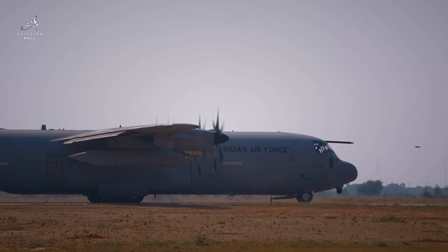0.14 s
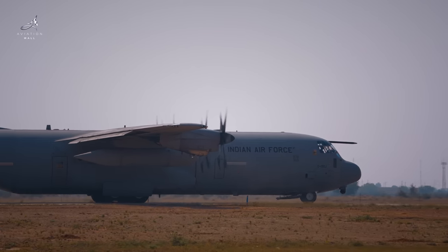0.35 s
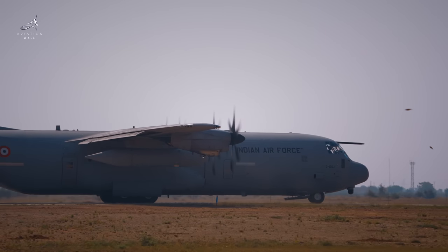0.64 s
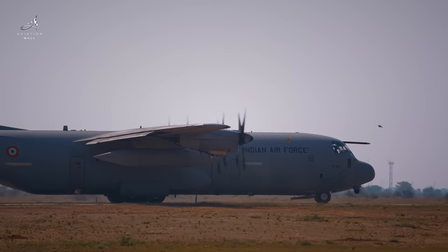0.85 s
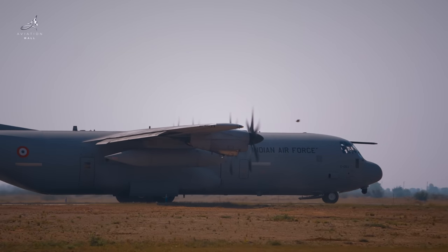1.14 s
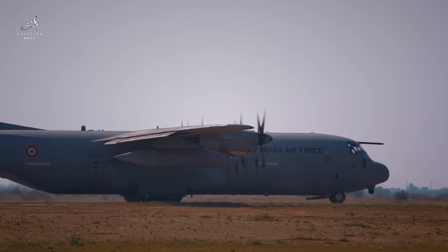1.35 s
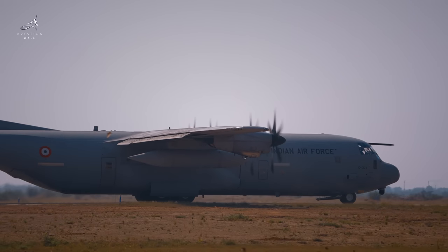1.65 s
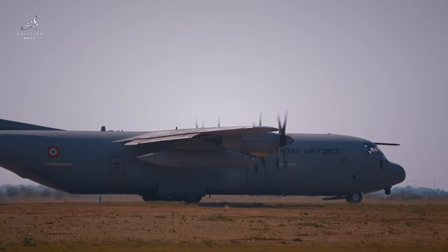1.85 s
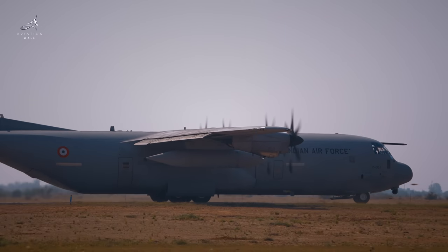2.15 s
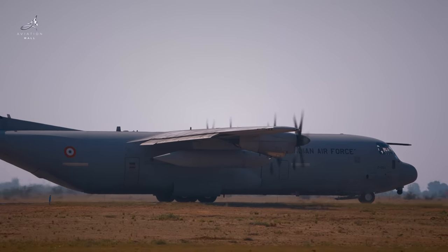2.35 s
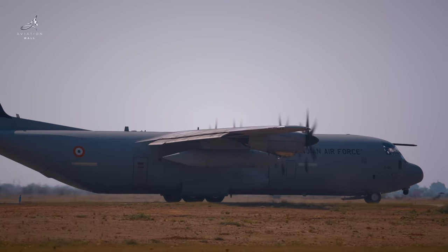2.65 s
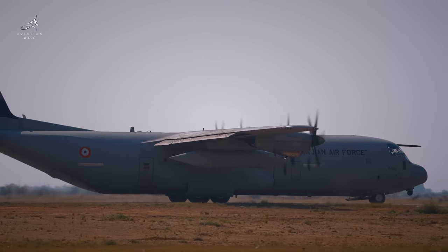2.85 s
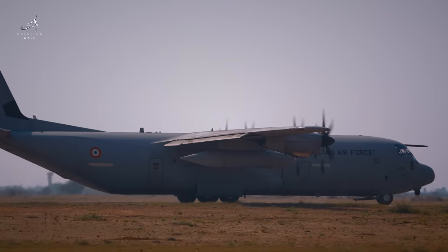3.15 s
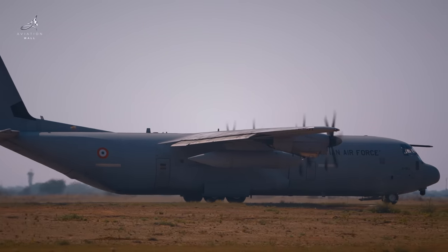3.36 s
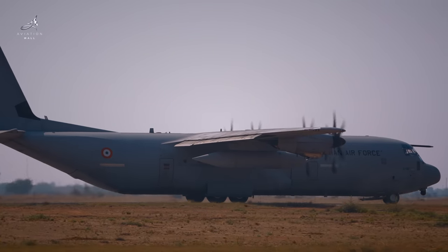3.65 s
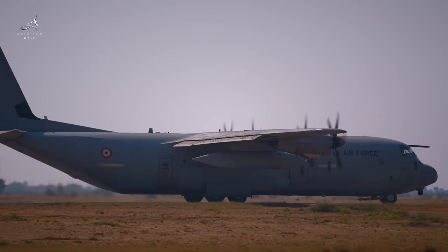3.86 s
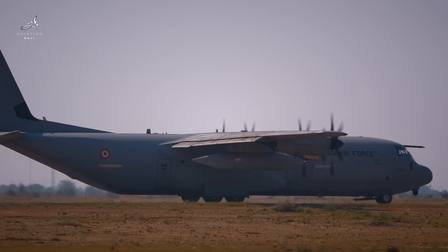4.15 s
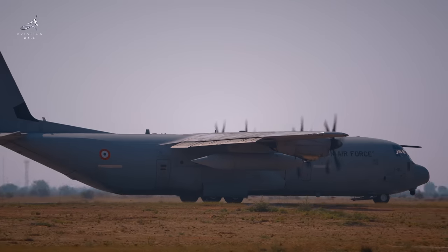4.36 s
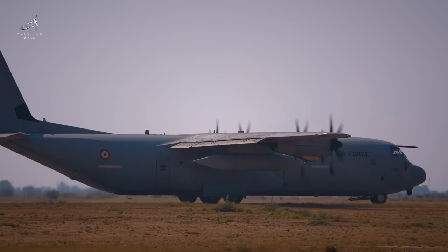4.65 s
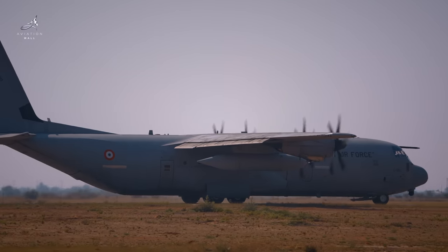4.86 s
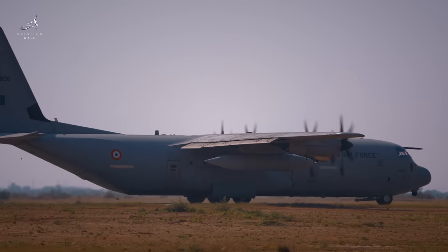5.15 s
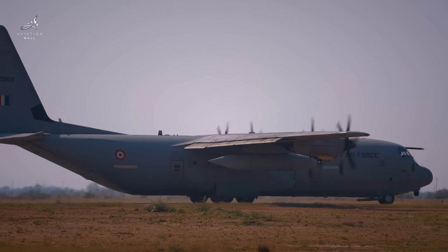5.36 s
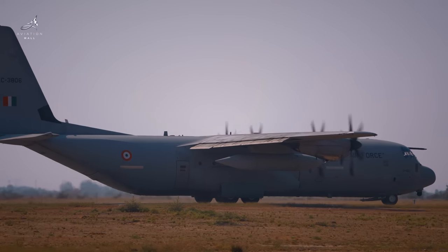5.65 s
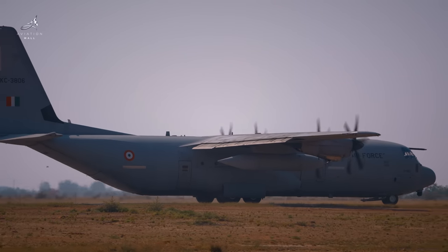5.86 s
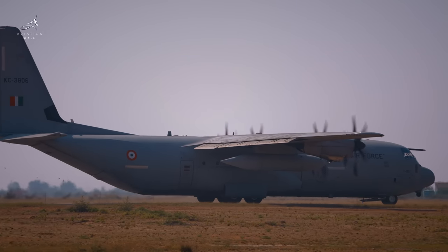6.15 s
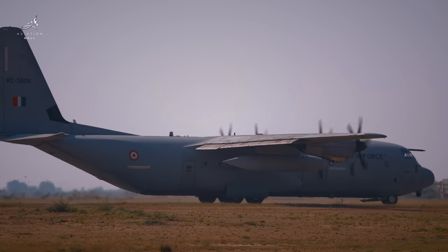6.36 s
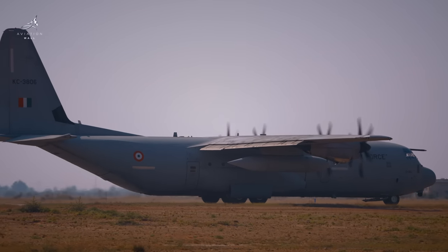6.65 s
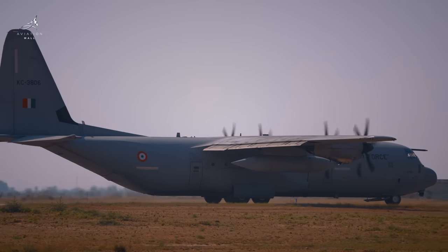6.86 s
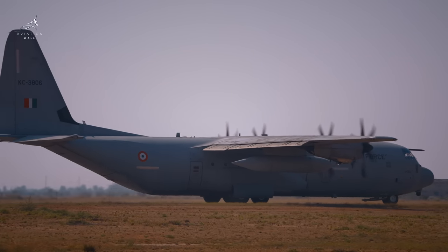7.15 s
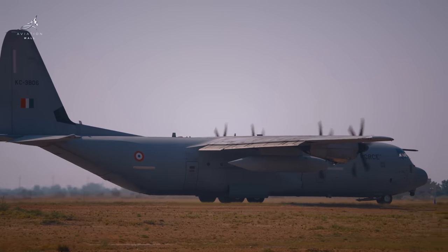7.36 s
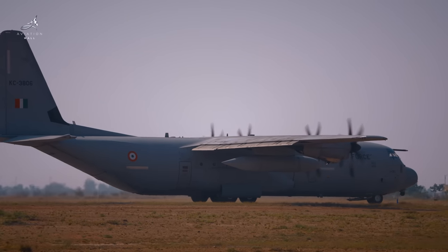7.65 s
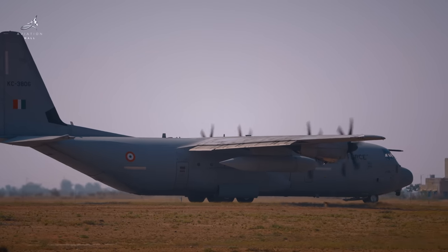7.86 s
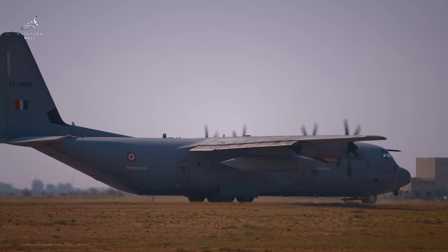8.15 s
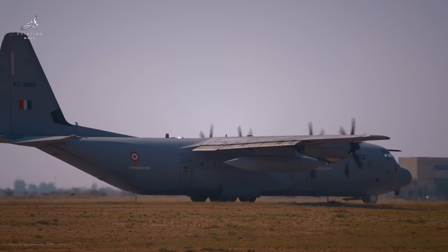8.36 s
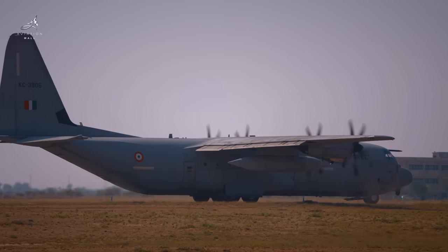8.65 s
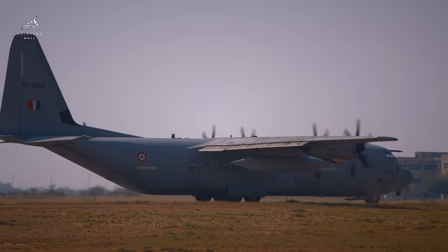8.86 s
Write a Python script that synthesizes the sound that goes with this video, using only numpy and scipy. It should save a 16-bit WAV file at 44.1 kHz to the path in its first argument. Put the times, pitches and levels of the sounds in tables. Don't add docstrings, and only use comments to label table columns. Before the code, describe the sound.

A large four-engine turboprop taxis far off across an open, dry airfield, picked up by one distant microphone. From 0 to 2.6 s, low wind gusts thump and flutter on the microphone over a wide rushing roar, fullest and brightest around 0.5 to 1.5 s. Beneath it the propellers, slightly out of step, hum near 70 Hz with higher harmonics, beating irregularly; blades put a fine rapid flutter in the roar, and a turbine whine is faint. From about 2 s the roar gradually weakens, becoming softest and more distant near 4.7 to 5.3 s, with the wind mostly calmer and the low drone still throbbing. From 6 s the roar swells again, strong by 7 to 7.5 s, with fuller upper drone harmonics as the aircraft turns tail on. Gusts return from 6.5 s, with a deep heave near 8.4 s. The roar eases slightly and continues to the end at 9 s.

```python
import sys
import numpy as np
from scipy import signal
from scipy.fft import next_fast_len
from scipy.io import wavfile
from scipy.ndimage import uniform_filter1d

SR = 44100
rng = np.random.default_rng(int(sys.argv[2]) if len(sys.argv) > 2 else 0)


def volts_from_db(level):
    exponent = np.asarray(level, float) / 20
    return 10 ** exponent


def generate_wav(signal):
    frames = np.transpose(np.atleast_2d(signal))
    scaled = np.clip(frames, -1, 1) * 32767
    pcm = np.round(scaled).astype(np.int16)
    wavfile.write(sys.argv[1], SR, pcm)


N = 397782

BLADE_RATES = [
    69.0,
    70.3,
    71.5,
    73.6,
]
ORDER_LEVELS = [-43, -42.5, -45]
ORDER_TURN_CHANGES = [-3.5, 3, 5]
ORDER_PATH_SHARES = [0.0, .1, 0.47]
# order, level_db
UPPER_ORDERS = [(4, -9), (5, -15), (6, -13.5)]
# peak_s, length_s, change_db
FIRST_ORDER_BEATS = [(.97, 0.18, -22), (1.64, .15, 5.5), (2.1, .2, 6), (2.38, .25, 7), (2.75, .2, -4),
                     (3.0, 0.14, 7), (3.35, 0.18, 3), (3.48, .1, -10), (3.95, 0.87, 5.5), (4.73, .15, -7),
                     (5.0, 0.18, 3.5), (5.65, .5, 4.5), (6.5, .3, 2), (6.95, .15, 3.5), (7.75, 0.32, 8),
                     (8.22, .25, -4)]
SECOND_ORDER_BEATS = [(.1, .3, -8), (.97, .15, -7), (1.25, .2, 4), (1.45, 0.17, -9), (2.0, .3, 3.5),
                      (2.7, 0.13, 5.5), (2.93, 0.14, 8), (3.2, 0.26, 5.5), (4.0, 0.13, 4.5),
                      (4.45, .3, 4.5), (5.33, .2, -6.5), (5.7, 0.48, 5), (6.2, 0.35, -4.5),
                      (6.7, 0.15, 8.5), (7.03, 0.23, 7), (7.85, 0.52, 6), (8.4, 0.36, 5.5), (8.88, .12, 4)]
THIRD_ORDER_BEATS = [(.7, 0.37, 2.5), (1.15, 0.19, 5), (1.65, .2, -4), (1.95, 0.35, 6.5), (2.28, .3, 9),
                     (2.6, .3, 3), (5.3, 0.51, 4.5), (5.55, 0.13, 4), (6.15, 0.37, 7), (6.65, .5, 5),
                     (7.15, 0.38, 5.5), (7.37, .15, -12), (7.88, 0.27, 8.5), (8.45, 0.41, 8),
                     (8.92, 0.17, 4.5)]
# time_s, turn_share (0 side on, 1 tail on)
HEADING = [
    (0, 0.0033),
    (2, .15),
    (4.5, .5),
    (6.5, 0.842),
    (9.02, 1),
]
# time_s, carried_db, clearness_db_per_octave
AIR_PATH = [(0.0, 2.5, -1.4), (.3, 2.5, -0.9), (.5, 5, 0.25), (.85, 5, 0.7), (1.15, 3.5, 0.65),
            (1.4, 4.3, 0.5), (1.9, 2, 0.44), (2.9, 0.5, 0), (3.3, -1.5, -0.5), (4.1, -2, .3), (4.7, -6, 0),
            (5.15, -6, -0.1), (6.0, -3, -0.3), (6.5, -0.5, -0.4), (7.1, 3, 0.4), (7.5, 3, 0.5),
            (8.3, 2, 0.1), (9.02, 1, -0.5)]
# pitch_hz, density_db
ROAR_SPECTRUM = [(40, -7), (90, -6.5), (170, -10), (290, -8.5), (480, -13.5), (800, -17), (950, -18),
                 (2250, -22.5), (2600, -25), (3600, -25.5), (5500, -36.5), (8000, -39.5), (9600, -55.5),
                 (11100, -62)]
# pitch_hz, change_db
TAIL_COLOUR = [(100, 1), (350, 3.9), (700, -3.5), (1100, 3), (2300, 1.5), (2700, -1), (3600, -1.5),
               (5500, 0)]
# peak_s, length_s, centre_hz, gain_db
AIR_LENSES = [(0.548, 0.26, 2000, 2), (.9, 0.36, 2530, 0.5), (1.25, 0.54, 3500, 2), (1.5, 0.44, 850, 2.5),
              (2.3, 0.21, 6500, 3.5), (2.902, .25, 2100, 2.5), (.15, .3, 1400, 3), (.3, 0.56, 450, 2),
              (1.85, 0.46, 1400, 3), (3.0, .2, 1100, 3.5), (3.7, .2, 1200, 1.5), (4.07, .25, 1000, 4),
              (4.6, .8, 320, -1), (5.7, 0.65, 6000, 2), (6.8, 0.37, 350, 0.5), (8.4, .5, 380, 2),
              (5.75, 0.77, 670, 3.5), (7.097, 0.5, 3250, 2.5), (7.45, 0.24, 6500, 2), (8.2, 0.41, 1800, 3),
              (8.297, .15, 5000, 3), (8.752, .3, 2090, 3.5)]
# pitch_hz, width_hz, level_db
WHINE_LINES = [(191.8, 10, -50), (292, 10, -53), (2127, 14, -63.5), (2177, 20, -62), (2250, 20, -63),
               (5100, 150, -70), (7262, 30, -73), (7300, 30, -75)]
# peak_s, length_s, heave_db, buffet_db
WIND_GUSTS = [(.05, 0.081, -24, -14.5), (.28, 0.27, -16.5, -27), (.53, 0.17, -11.5, -24),
              (.75, 0.31, -26, -25), (1.05, 0.27, -13.5, -16.5), (1.23, 0.19, -20.5, -12.5),
              (1.48, .16, -11.5, -10.5), (1.74, 0.24, -13.5, -18), (1.97, 0.13, -25, -16),
              (2.14, 0.1, -18, -15.5), (2.35, 0.11, -17.5, -30), (2.55, .16, -17, -10.5),
              (3.25, 0.23, -36, -27), (3.7, 0.41, -26.5, -34), (3.97, 0.33, -18, -25),
              (4.32, 0.19, -16.5, -30), (4.56, .2, -25.5, -37), (5.18, 0.39, -22.5, -31),
              (6.2, 0.23, -23, -38), (6.5, 0.11, -14.5, -22), (6.65, 0.18, -15.5, -30),
              (6.86, 0.14, -13, -20), (7.05, .25, -29, -25.5), (7.35, 0.29, -26, -34),
              (7.75, .2, -18, -20.5), (7.95, 0.17, -14, -26), (8.14, .25, -12.5, -12),
              (8.38, 0.12, -5, -25.5), (8.66, 0.23, -18.5, -18), (8.97, 0.37, -17.5, -19.5)]
CALM_LEVELS = [-32.5, -62]
# pitch_hz, density_db
HEAVE_SPECTRUM = [(2, -25), (5, -1.5), (11, 15), (16, 3.5), (24, -30.5), (60, -69.5), (400, -150)]
BUFFET_SPECTRUM = [(8, -25.5), (17, 7), (24, -4), (38, -12.5), (60, -25.5), (110, -44.5), (300, -69.5),
                   (1500, -150)]
# pitch_hz, density_db
HISS_SPECTRUM = [(6000, -106), (11000, -106), (13000, -106), (14000, -107), (15700, -107)]


def drone(turns):
    all_beats = [FIRST_ORDER_BEATS, SECOND_ORDER_BEATS, THIRD_ORDER_BEATS]
    levels = []
    for k, beats in enumerate(all_beats):
        level_db = ORDER_LEVELS[k] + ORDER_TURN_CHANGES[k] * (column(HEADING, 1) - 0.5)
        level_db = level_db + ORDER_PATH_SHARES[k] * column(AIR_PATH, 1)
        _, _, beat_db = np.transpose(beats)
        levels.append(volts_from_db(level_db + swells(beats, beat_db)))
    first = order(turns, 1)
    second = order(turns, 2)
    upper = order(turns, 3)
    for k, db in UPPER_ORDERS:
        upper = upper + volts_from_db(db) * order(turns, round(k))
    return levels[0] * first + levels[1] * second + levels[2] * upper


def blades():
    doppler = -0.012
    heard_s = np.cumsum(1 + doppler * (column(HEADING, 1) - 0.5)) / SR
    return [hz * heard_s + rng.random() + 0.05 * drift(2.0).real for hz in BLADE_RATES]


def order(turns, k):
    lines = sum(np.exp(2j * np.pi * k * turn) * (1 + 0.4 * drift(2.0 * k)) for turn in turns)
    return steadied(evened(lines), 0.57, size=2200)


def roar(turns):
    frames = N // 256 + 5
    hz = np.fft.rfftfreq(1024, 1 / SR)
    t = np.arange(frames) * 256 / SR
    real, imaginary, patches = rng.standard_normal((frames, 513, 3)).T
    patches = uniform_filter1d(patches, size=24, axis=0)
    patches = evened(uniform_filter1d(patches, size=10, axis=1))
    flicker = evened(uniform_filter1d(rng.standard_normal(frames), size=5))

    octaves = np.log2(np.clip(hz, 400, 7000) / 1500)[:, None]
    path_db = column(AIR_PATH, 1, t) + octaves * column(AIR_PATH, 2, t)
    path_db = path_db * np.clip(hz / 250, 0.3, 1)[:, None]
    turn_db = read(TAIL_COLOUR, hz)[:, None] * (column(HEADING, 1, t) - 0.5)
    patch_db = 0.8 * patches * np.clip(hz / 1500, 0.3, 1)[:, None]
    field_db = read(ROAR_SPECTRUM + [(16000, -82)], hz)[:, None]
    field_db = field_db + path_db + turn_db + lenses(hz, t) + patch_db + 0.22 * flicker

    field = (real + 1j * imaginary) * volts_from_db(field_db)
    wide = evened(signal.istft(field, nperseg=1024, noverlap=768)[1][:N])
    middle_band = signal.butter(1, [1200, 4500], "band", fs=SR, output="sos")
    middle = signal.sosfilt(middle_band, wide)
    chop = 0.14 * np.cos(2 * np.pi * turns[3]) + 0.04 * np.cos(2 * np.pi * turns[2])
    return volts_from_db(-33.5) * (wide + chop * middle)


def lenses(hz, t):
    peak_s, length_s, centre_hz, gain_db = np.transpose(AIR_LENSES)
    octaves = np.log2((hz[:, None] + 1) / centre_hz)
    over_pitch = np.exp(-(octaves / 0.43) ** 2)
    over_time = np.exp(-(2 * (t[:, None] - peak_s) / length_s) ** 2)
    return (over_pitch * gain_db) @ over_time.T


def whine():
    t = np.arange(N) / SR
    lines = np.zeros(N)
    for hz, width_hz, db in WHINE_LINES:
        tone = drift(width_hz / 2) * np.exp(2j * np.pi * hz * t)
        lines += volts_from_db(db) * np.sqrt(2) * tone.real
    carried_db = column(AIR_PATH, 1)
    return lines * volts_from_db(0.3 * (carried_db - carried_db.mean()))


def wind():
    _, _, heave_db, buffet_db = np.transpose(WIND_GUSTS)
    heave = volts_from_db(CALM_LEVELS[0]) + swells(WIND_GUSTS, volts_from_db(heave_db))
    buffet = volts_from_db(CALM_LEVELS[1]) + swells(WIND_GUSTS, volts_from_db(buffet_db))
    slow = heave * steadied(coloured(HEAVE_SPECTRUM), 0.86, size=2500)
    quick = buffet * steadied(coloured(BUFFET_SPECTRUM), 0.79, size=2000)
    return slow + quick


def electronic_hiss():
    return volts_from_db(-75) * coloured([(1000, -140)] + HISS_SPECTRUM + [(20000, -115)]).real


def column(rows, index, t=None):
    rows = np.array(rows)
    return np.interp(np.arange(N) / SR if t is None else t, rows[:, 0], rows[:, index])


def read(points, hz):
    point_hz, value = np.transpose(points)
    return np.interp(np.log(hz + 1), np.log(point_hz + 1), value)


def swells(rows, heights):
    t = np.arange(0, N + 64, 64) / SR
    rows = np.array(rows)
    bells = np.exp(-(2 * (t[:, None] - rows[:, 0]) / rows[:, 1]) ** 2)
    return np.interp(np.arange(N) / SR, t, bells @ heights)


def evened(x):
    return x / np.sqrt(np.mean(abs(x) ** 2) + 1e-20)


def coloured(points):
    size = next_fast_len(N)
    hz = np.fft.fftfreq(size, 1 / SR)
    spectrum = np.fft.fft(rng.standard_normal(size)) * volts_from_db(read(points, abs(hz))) * (hz > 0)
    return evened(np.fft.ifft(spectrum)[:N])


def drift(top_hz):
    hz = top_hz * rng.standard_normal(40)
    t = np.arange(0, N + 32, 32) / SR
    coarse = np.exp(2j * np.pi * (hz[:, None] * t + rng.random((40, 1)))).sum(0)
    return evened(np.interp(np.arange(N) / SR, t, coarse))


def steadied(z, share, size):
    slow = np.sqrt(uniform_filter1d(abs(z) ** 2, size) + 0.022)
    return evened((z / slow ** np.clip(share, 0, 1)).real)


def scene():
    turns = blades()
    return (drone(turns) + roar(turns) + whine() + wind())[None]


def top_cut(x):
    return signal.sosfilt(signal.butter(12, 15760, fs=SR, output="sos"), x)


def record(dry):
    mix = dry + electronic_hiss()
    return top_cut(mix)


dry = scene()
out = record(dry)
generate_wav(out)
```